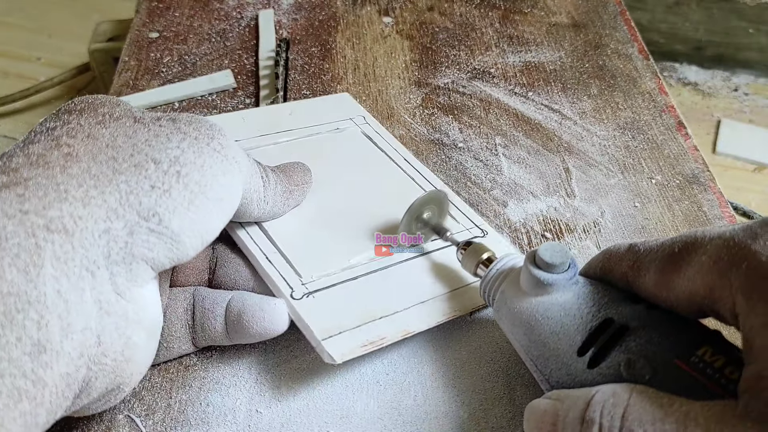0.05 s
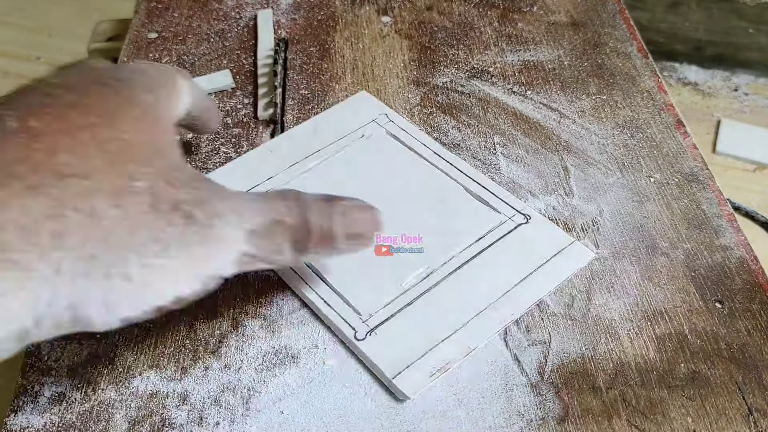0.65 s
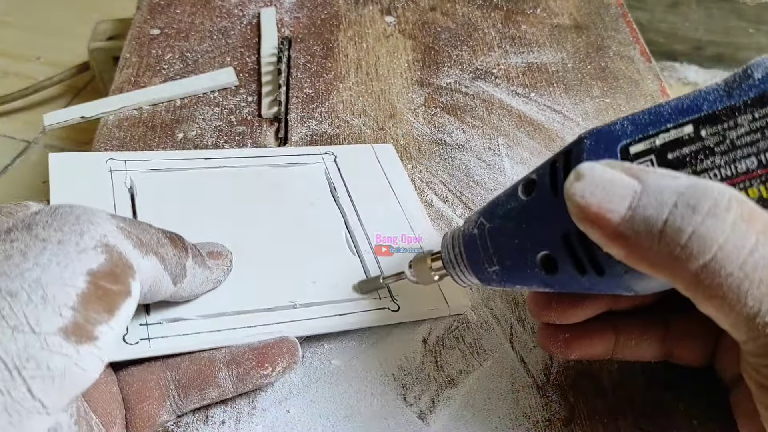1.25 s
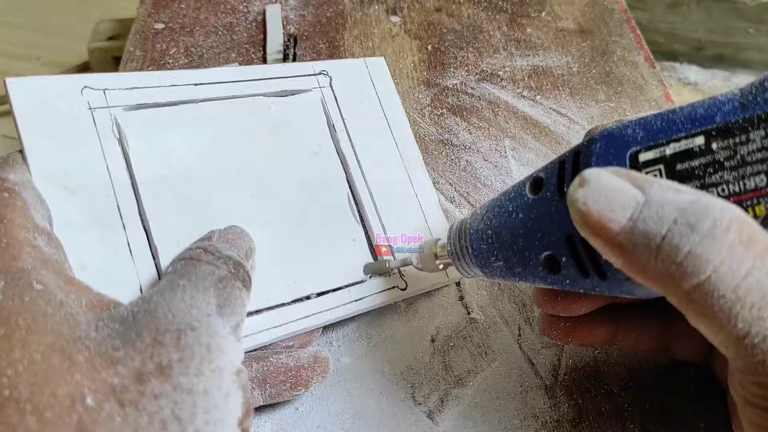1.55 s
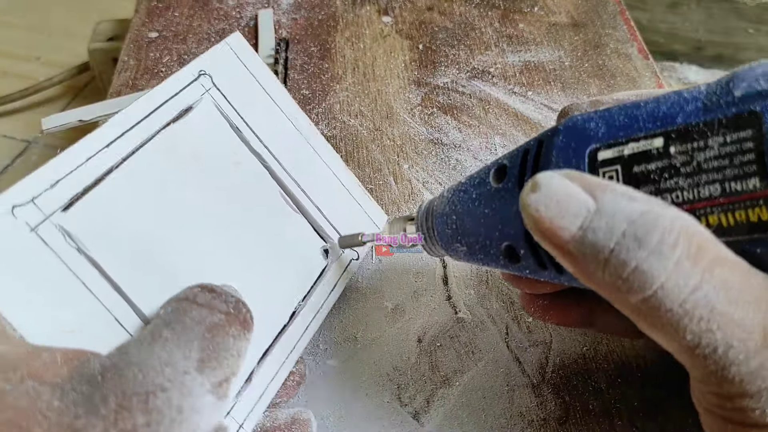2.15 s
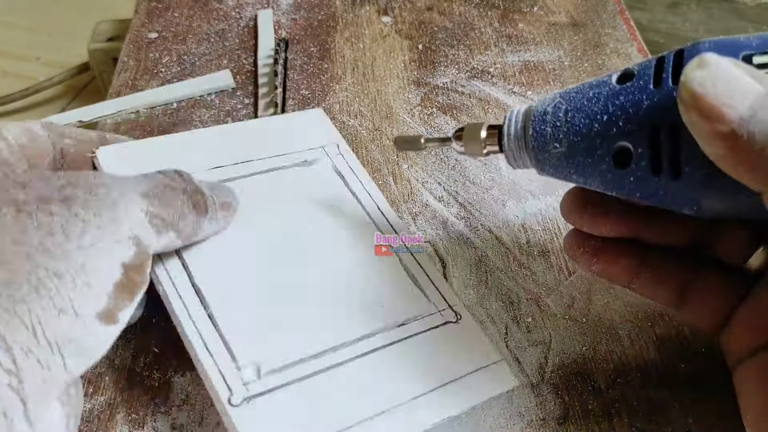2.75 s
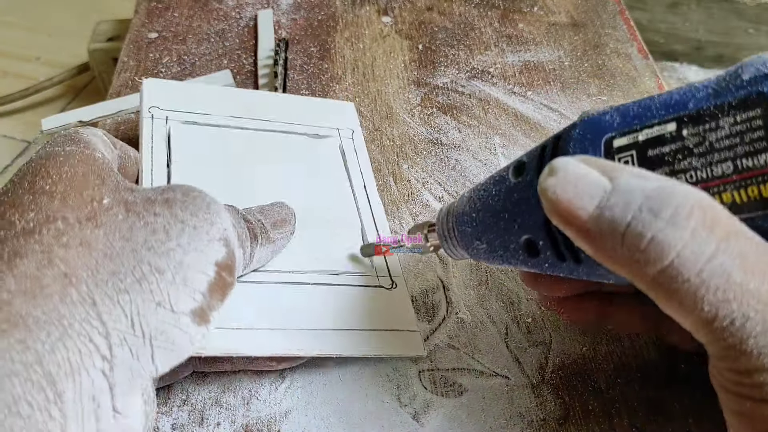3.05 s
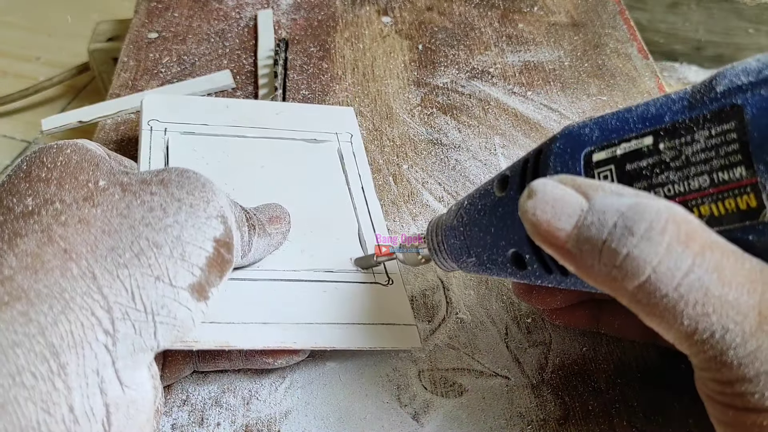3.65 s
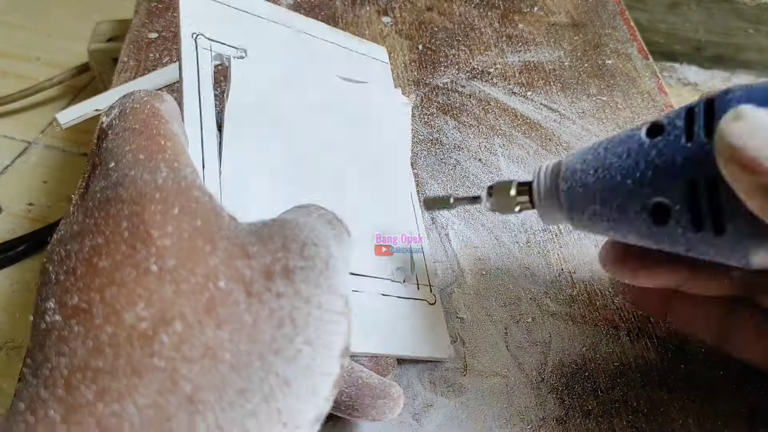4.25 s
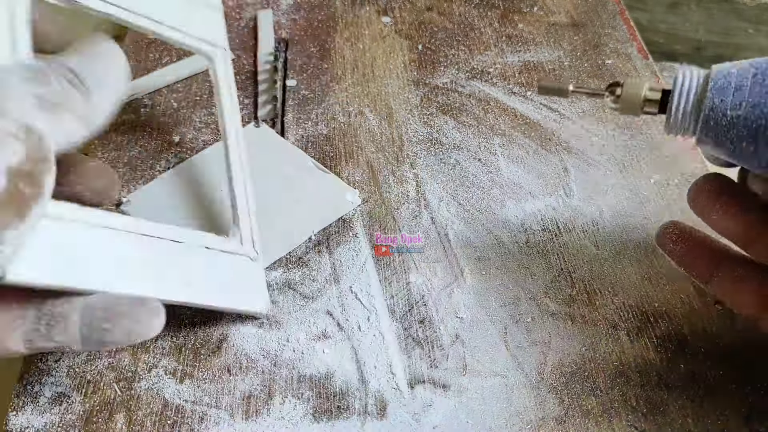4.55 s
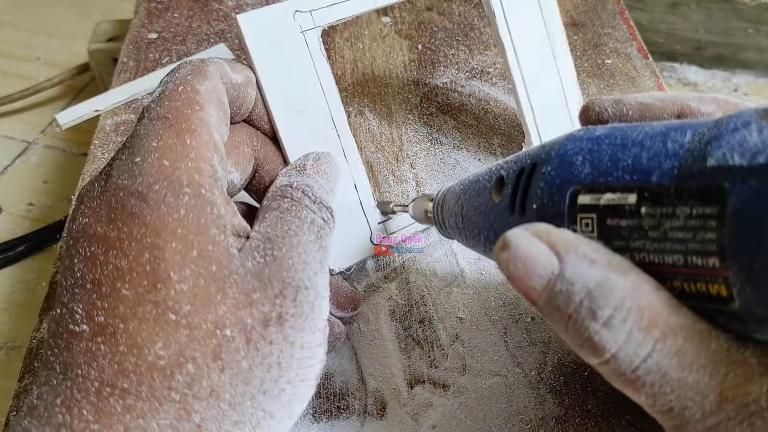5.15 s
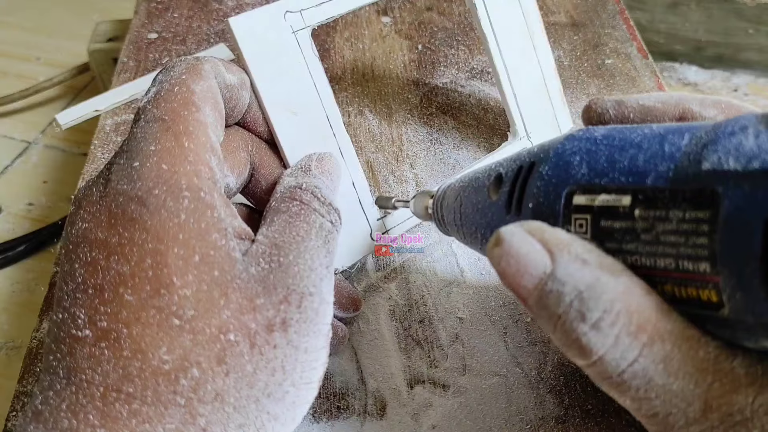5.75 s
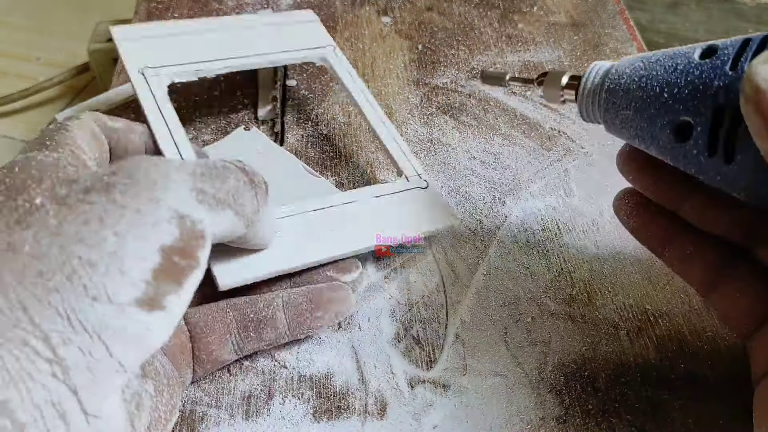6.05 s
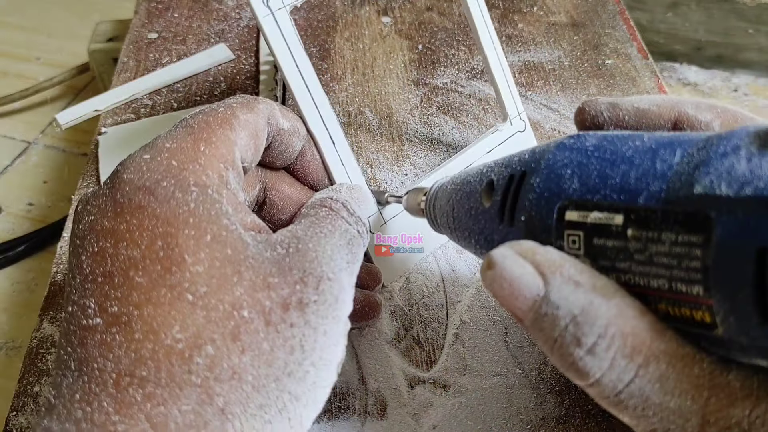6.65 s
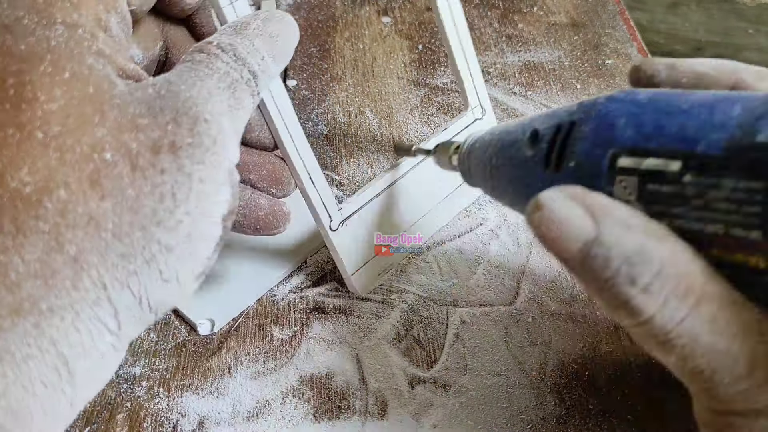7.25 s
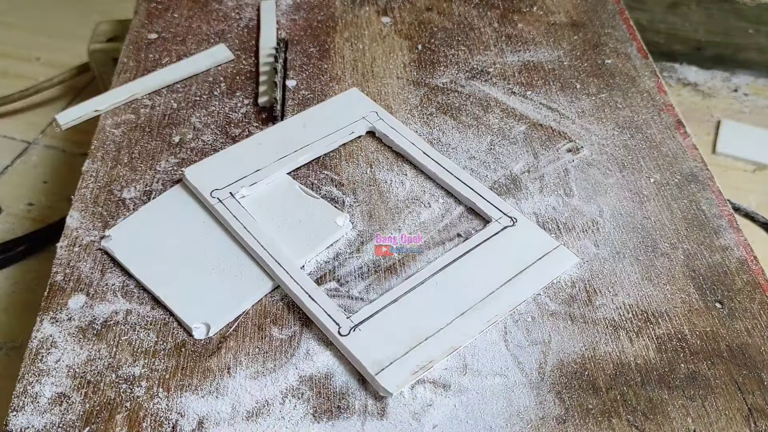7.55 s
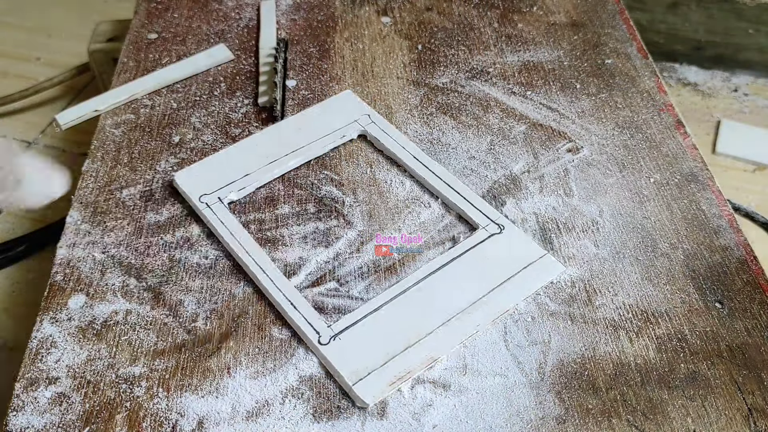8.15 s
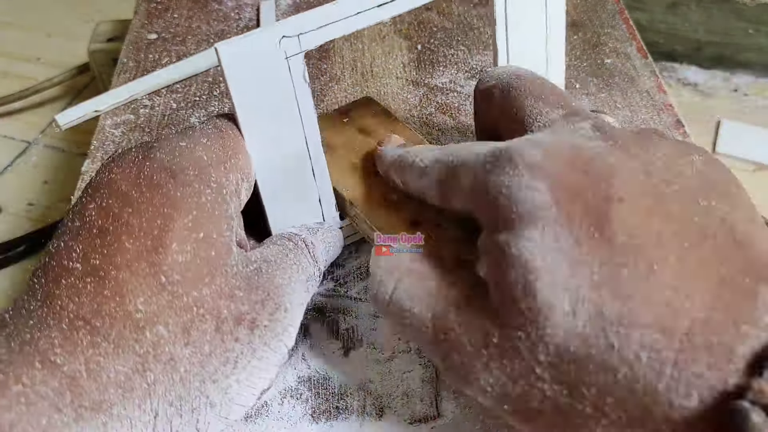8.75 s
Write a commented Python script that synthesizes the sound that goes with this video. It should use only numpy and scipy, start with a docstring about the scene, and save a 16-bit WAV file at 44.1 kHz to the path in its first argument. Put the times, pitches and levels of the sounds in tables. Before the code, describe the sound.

A handheld rotary grinder rasps into a plastic sheet, then spins up to a high, hissing whine. It bites in again and again, its pitch sagging each time as the plastic buzzes, chatters, squeals and ticks. Near the end the motor is switched off and runs down, the piece is picked up with soft bumps, and a sanding block scrapes briefly. Close stereo sound in a small, dry workshop.

```python
"""Close to a workbench in a small, dry workshop, a stereo microphone hears a hand-held rotary grinder.
Its motor whines and hisses as a thin disc makes the first cut in a plastic sheet. A burr makes the rest:
each bite drags the speed down, and the sheet buzzes once a turn, chatters, squeals and ticks.
Near eight seconds the motor is switched off and runs down. The cut frame is picked up,
and a sanding block judders along its edge."""
import sys
import numpy as np
from scipy import signal
from scipy.fft import rfft, irfft, next_fast_len
from scipy.io import wavfile
from scipy.ndimage import map_coordinates

SR = 44100
rng = np.random.default_rng(int(sys.argv[2]) if len(sys.argv) > 2 else 0)


def to_wav(sig):
    """Store sig (one row per channel, or 1-D mono) as 16-bit WAV at the path in sys.argv[1].

    Samples outside -1..1 are clipped; the rate is SR.
    """
    pcm = np.clip(np.atleast_2d(sig), -1, 1) * 32767
    pcm = np.round(pcm).astype(np.int16)
    wavfile.write(sys.argv[1], SR, pcm.T)  # frames by channels


N = 397341
TIME = np.arange(N) / SR
DISC_END_S, POWER_OFF_S, STOP_S = .45, 7.715, 8.05


def amp(db):
    """Decibels to gain."""
    return 10 ** (np.asarray(db) / 20)


def unit(x):
    """Scale to rms 1."""
    return x / np.sqrt(np.mean(x ** 2) + 1e-20)


def along(points, hz):
    """Read (Hz, value) points on a log axis."""
    freqs, values = np.transpose(points)
    return np.interp(np.log(hz + 1), np.log(freqs + 1), values)


def curve(points):
    """Read (seconds, value) points at every sample."""
    return np.interp(TIME, *np.transpose(points))


def gate(start, end, fade):
    """1 between two times, with ramps outside them."""
    return np.clip(np.minimum(TIME - start, end - TIME) / fade + 1, 0, 1)


def since(start):
    """Seconds after a time, 0 before it."""
    return np.maximum(TIME - start, 0)


def swell(centre, length):
    """A smooth rise and fall around a time."""
    return np.exp(-np.minimum((2 * (TIME - centre) / length) ** 2, 20))


def blows(rows, rise, t60):
    """An envelope that jumps and dies away at each (seconds, dB) row."""
    return sum(amp(db - 60 * since(s) / t60) * (1 - np.exp(-since(s) / rise)) for s, db in rows)


def wobble(rate):
    """A smooth random curve, rate knots a second."""
    knots = rng.standard_normal(int(N * rate / SR) + 4)
    coarse = TIME[::max(1, int(SR / rate / 10))]
    return np.interp(TIME, coarse, map_coordinates(knots, [coarse * rate]))


def noise():
    """White noise, unrelated left and right."""
    return rng.standard_normal((2, N))


def partial(phase, spread):
    """A sine whose phase drifts apart left and right."""
    apart = spread * wobble(3) * np.array([[1], [-1]])
    return np.sin((phase % (2 * np.pi) + apart).astype(np.float32))


def filtered(x, response):
    """x times a response of frequency."""
    size = next_fast_len(N + 8192)
    return irfft(rfft(x, size) * response(np.fft.rfftfreq(size, 1 / SR)), size)[..., :N]


def coloured(x, spectrum):
    """x through a (Hz, dB) spectrum, at rms 1."""
    return unit(filtered(x, lambda hz: amp(along(spectrum, hz))))


def pan(left_db):
    """Channel gains for a left minus right level."""
    return amp(np.array([[.5], [-.5]]) * left_db)


def scatter(x, share, t60):
    """Bench and hands reflect a close source differently to each side of the microphone."""
    t = np.arange(1024) / SR
    echoes = rng.standard_normal((2, len(t))) * amp(-60 * t / t60)
    paths = np.sqrt(share) * echoes / np.linalg.norm(echoes, axis=1, keepdims=True)
    paths[:, 0] = np.sqrt(1 - share)
    return signal.fftconvolve(x[None], paths, axes=1)[:, :N]


# The tool bites the sheet. Each row: start, end and lean-in time in seconds, drag in turns a second,
# relative cutting level in dB at the start and at the end, relative hum in dB, share of rasp from 0 to 1.
BITES = [ (0, 0.101, .0087, 258, -25, -27.5, -38, 0.67), (0.102, 0.216, .005, 188, -28, -31.5, -49, 0.85),
         (0.231, 0.293, .01, 0, -31.5, -33, -40, 0.99), (0.314, 0.416, .013, 0, -28, -31, -31.5, 0.6),
         (1.211, 1.488, .085, 127.5, -23.5, -21, -36.5, 0.15),
         (1.605, 1.655, .0082, 75, -26, -35, -42, 0.4), (1.873, 2.014, .023, 88.5, -32, -26.5, -39.5, 0.4),
         (2.291, 2.508, .044, 102.5, -31, -24.5, -40, 0.38),
         (3.245, 3.75, .085, 162, -24.5, -22, -33, 0.27), (3.803, 3.936, .012, 133, -33, -29, -43.5, 0.1),
         (3.948, 4.048, .01, 0, -30.5, -32.5, -45, 0.26), (4.064, 4.294, .01, 103, -30.5, -27.5, -29, 0.37),
         (5.187, 5.421, .069, 84, -27, -24, -36.5, 0.29), (5.55, 5.746, .035, 87, -29, -26, -36, 0.5),
         (6.542, 6.89, .17, 117.5, -31.5, -22.5, -62, 0.5),
         (7.09, 7.309, .069, 22.5, -30.5, -27.5, -60, 0.26)]
def feed():
    """Each bite drags on the shaft, drives the sheet and shakes the tool; the hand is never steady."""
    drag, force, shake, rasp = np.zeros((4, N))
    for start, end, lean, drag_hz, first_db, last_db, hum_db, share in BITES:
        held = gate(0, end, fade=.005)
        touch = held * gate(start, TIME[-1], fade=.022) ** 2  # grazes just before it bites
        drag += drag_hz * held * (1 - np.exp(-since(start) / lean))
        force = np.maximum(force, touch * amp(np.interp(TIME, [start, end], [first_db, last_db])))
        shake = np.maximum(shake, touch * amp(hum_db))
        rasp[touch > 0] = share
    return drag, force * amp(.8 * wobble(30)), shake, rasp


# The unloaded shaft. Each row: time in seconds, speed in turns a second.
FREE_SPEED = [(1, 412.5), (3, 405.4), (5, 403.2), (6.4, 398.1), (7.6, 403.6)]
# The pitch jumps, then settles. Each row: time in seconds, turns a second gained.
SPEED_JUMPS = [(0, -126), (.43, 25.5), (3.77, 60), (4.055, 10), (7.075, 22)]
def shaft_speed(drag):
    """Turns a second: the shaft sags under drag, recovers with inertia and coasts once switched off."""
    inertia_s, coast_hz_per_s = .247, 410
    keep = np.exp(-1 / (inertia_s * SR))
    sag = signal.lfilter([1 - keep], [1, -keep], drag)
    jumps = sum(gain * gate(s, TIME[-1], fade=.01) * np.exp(-since(s) / inertia_s)
                for s, gain in SPEED_JUMPS)
    coast = coast_hz_per_s * np.minimum(since(POWER_OFF_S), STOP_S - POWER_OFF_S)
    drift = 1 + .0009 * wobble(35)
    return (curve(FREE_SPEED) - sag + jumps - coast) * drift


# Harmonics of the shaft. Each row: order, relative level in dB.
ORDER_LEVELS = [(2, -0.5), (3, -2), (4, 4), (5, -5.5), (6, -1), (7, -2), (8, 1), (9, 2.5), (10, 1.5),
                (11, 0), (12, 0.5), (13, 8), (14, 6), (15, 0.5), (16, 0.5), (17, 1.5), (18, 1), (19, -1),
                (20, 4.5), (21, 6.5), (22, 4.5), (23, 6), (24, 6), (25, 4.5), (26, 9.5), (27, 4), (30, 8.5),
                (38, 6.5)]
# Single orders whistle out as the tool turns in the hand.
# Each row: centre in seconds, order, boost in dB, length in seconds.
WHISTLES = [(3.04, 22, 1, 0.55), (4.17, 21, 5.5, 0.39), (0.92, 17, 6.5, 0.69), (1.1, 19, 3.5, 0.34),
            (1.108, 14, 8, 0.12), (1.62, 21, 6.5, 0.16), (2.19, 22, 9.5, 0.36), (3.12, 18, 7, 0.19),
            (3.15, 9, 7, 0.13), (5.118, 14, 4.5, 0.19), (5.122, 16, -1, .3), (5.73, 21, 12, 0.22),
            (6.15, 11, 10.5, 0.23), (6.152, 12, 13, 0.22), (4.3, 14, 10, .25), (6.451, 17, 8, 0.3),
            (7.39, 17, 8, 0.59), (7.2, 19, 9.5, 0.3)]
def whine(phase):
    """Commutator and fan sing on the shaft orders, each fluttering on its own."""
    tones = np.zeros((2, N))
    for order in range(2, 39):
        boost_db = sum(db * swell(s, length) for s, k, db, length in WHISTLES if k == order)
        level_db = np.interp(order, *np.transpose(ORDER_LEVELS)) + boost_db
        offset = rng.uniform(0, 2 * np.pi) + .33 * wobble(110)
        flutter_db = 2.2 * wobble(38) + 2.2 * wobble(6)
        tones += amp(level_db + flutter_db) * partial(order * phase + offset, spread=.9)
    return tones


# Colour of the casing and vents. Each row: frequency in Hz, relative level in dB.
CASING_COLOUR = [(70, -39), (150, -62.5), (300, -12), (480, -21.5), (750, -14.5), (1250, -3.5),
                 (1600, -6.5), (1900, -6.5), (3600, -11.5), (5200, -6), (7500, 3), (8800, -0.5),
                 (10000, -15.5), (11200, -25.5), (15000, -32)]
# The vents beam unevenly at the microphone. Each row: frequency in Hz, left minus right in dB.
VENT_BEAM = [(200, 9.5), (770, 6.5), (1800, 4.5), (2700, 1), (4200, -1.5), (6400, -2.5), (7700, -6),
             (8800, 8.5), (10000, 4.5), (13000, -1)]
# Whine and hiss from close by. Each row: time in seconds, level at full speed in dB.
MOTOR_LEVEL = [(0, -14), (.22, -18.5), (.38, -16.5), (.45, -24), (.58, -22.5), (.86, -20), (1.4, -20.5),
               (2.2, -20.5), (2.9, -21.5), (3.14, -19), (3.33, -20.5), (3.7, -15.5), (3.9, -19),
               (4.5, -20.5), (5.1, -19.5), (5.5, -21), (6.5, -20), (6.8, -20), (7.38, -19.5), (7.6, -22),
               (7.87, -34), (8.04, -34.5)]
# The grinder moves across the bench. Each row: time in seconds, left minus right in dB.
MOTOR_PAN = [(0, -0.5), (1.7, 1.5), (2.25, 0.8), (2.75, -1), (3.3, 2), (4.2, 1), (4.75, -1), (5.75, 0),
             (6.25, 0.5), (6.75, -1.5), (7.25, 0), (7.75, -5.5)]
def motor(speed, turns, force):
    """The motor whines clearly when free; under load it dissolves into brush hiss, pulsing once a turn."""
    steady_order, steady_db = 13, -17  # the most constant tone, against the whole casing
    slowing_db_per_hz = .0672
    phase = 2 * np.pi * turns
    free = speed / speed.max()
    rattle = (.008 + .05 * (1 - free)) * wobble(130)  # load shakes the shaft and blurs high orders
    tones = whine(phase + rattle)
    sparks = (1 + .5 * np.cos(phase)) * amp(wobble(700))
    hiss = coloured(noise() * sparks, CASING_COLOUR)
    clear = .77 * free ** 2.2 * gate(0, POWER_OFF_S, fade=.12) / (1 + (force / amp(-27)) ** 2)
    casing = unit(np.sqrt(clear) * coloured(tones, CASING_COLOUR) + np.sqrt(1 - clear) * hiss)
    casing = unit(filtered(casing, lambda hz: pan(along(VENT_BEAM, hz))))
    steady_gain = amp(steady_db + 2.5 * wobble(30) + 1.8 * wobble(7)) * clear * free ** 6
    casing += steady_gain * unit(partial(steady_order * (phase + rattle), spread=.5))
    level_db = curve(MOTOR_LEVEL) - slowing_db_per_hz * (speed.max() - speed)
    casing *= amp(level_db + 1.53 * wobble(45)) * pan(curve(MOTOR_PAN))
    return casing * gate(0, STOP_S, fade=.0027)


# Tones of the supply. Each row: frequency in Hz, relative level in dB.
MAINS_TONES = [(200, -6), (300, -5), (600, -1)]
# Their faint buzz, left of the microphone. Each row: time in seconds, level in dB.
MAINS_LEVEL = [(0, -62), (1, -64.5), (2, -61.5), (2.7, -53), (3.3, -60.5), (4.6, -57.5), (5.2, -62.5),
               (7.7, -62)]
def mains_buzz():
    """The supply makes the motor laminations buzz until the switch is released."""
    tones = sum(amp(db + 3.1 * wobble(12)) * unit(np.sin(2 * np.pi * hz * TIME)) for hz, db in MAINS_TONES)
    return amp(curve(MAINS_LEVEL)) * tones * gate(0, POWER_OFF_S, fade=.018) * pan(6.28)


# Hum of the free shaft, a little to the left. Each row: time in seconds, relative level in dB.
HUM_LEVEL = [(.47, -60), (.64, -39), (1.1, -46), (1.7, -38), (2.35, -43), (2.54, -52), (2.64, -38),
             (3.2, -45), (3.9, -60), (4.65, -38.5), (4.95, -43), (5.07, -53), (5.2, -40), (5.8, -36),
             (6.12, -49), (6.26, -40), (7.42, -43.5), (7.75, -62), (8.05, -84)]
def shaft_hum(turns, shake):
    """The unbalanced shaft hums once a turn, louder when a bite shakes the tool."""
    flutter = amp(1.2 * wobble(35) + 1.1 * wobble(9))
    level = np.hypot(amp(curve(HUM_LEVEL)), shake) * amp(1)
    return level * flutter * unit(partial(2 * np.pi * turns, spread=.35)) * pan(3.1)


# The tool bounces. Each row: start and end in seconds, turns per bounce, depth from 0 to 1.
CHATTER = [(.05, .36, 2, .35), (1.59, 1.66, 3, .5), (3.18, 3.28, 2, .6), (3.58, 3.74, 3, .4),
           (3.82, 4.05, 3, .6), (6.58, 6.8, 3, .35), (7.07, 7.32, 4, .5)]
# Colours of the grinding disc, the sheet under the burr and the tearing dust, all close up.
# Each row: frequency in Hz, relative level in dB.
DISC_COLOUR = [(200, -27), (480, 0.5), (680, -10.5), (950, 6), (1200, -1), (1650, 0), (2000, -6), (2230, 2),
               (2500, -3), (3200, -3.5), (6500, -0.5), (8200, -8), (10000, -8.5), (15000, -25)]
SHEET_COLOUR = [(200, -44), (350, -40), (560, -0.5), (740, -2), (950, -2), (1170, 3), (1400, 3),
                (1550, 1.5), (1850, -1), (2300, -3), (2900, -5.5), (3500, -9), (4500, -12), (6000, -24)]
DUST_COLOUR = [(200, -34), (550, -20), (850, -12), (1400, 11.5), (2000, -2.5), (3000, -0.5), (3800, -6.5),
               (5200, 0), (9000, -3.5), (15000, -29)]
def cutting(turns, drag, force, rasp):
    """First the disc grinds; later the burr strikes the sheet once a turn, tearing off puffs of dust."""
    firm_drag_hz = 36  # the bite turns bright here
    bounce = np.ones(N)
    for start, end, period, depth in CHATTER:
        swing = np.cos(2 * np.pi * turns / period + .9 * wobble(40))
        bounce += depth * gate(start, end, fade=.0033) * swing
    contact = turns + .003 * wobble(140) + .025 * (bounce - 1)  # a bounce shifts the next strike
    strength = bounce * amp(.6 * wobble(350) + 1.2 * wobble(40))
    light_touch = (TIME > DISC_END_S) / (1 + (drag / firm_drag_hz) ** 2)
    strikes = np.zeros((2, N))
    for order in range(2, 17):  # the orders lock into hard strikes
        dull_db = max(order - 4, 0) * light_touch
        emphasis_db = 2.4 * wobble(16) + 1.1 * wobble(90)  # shifts as the burr travels along the cut
        phase = 2 * np.pi * order * contact + .03 * order * wobble(90)
        strikes += amp(emphasis_db - dull_db) * partial(phase, spread=.95)
    strikes *= strength
    puffs = noise() * strength * np.exp(-((contact % 1 - .5) / .53) ** 2)
    tone, grit = np.sqrt(1 - rasp), np.sqrt(rasp)
    burr = amp(-1.3) * tone * coloured(strikes, SHEET_COLOUR) + amp(1) * grit * coloured(puffs, DUST_COLOUR)
    disc = tone * coloured(strikes, DISC_COLOUR) + grit * coloured(noise() * strength, DISC_COLOUR)
    cut = force * np.where(TIME < DISC_END_S, amp(1) * disc, burr)
    return (cut + np.sqrt(np.abs(strength)) * squeals(contact)) * pan(.72)


# The workshop around the bench. Each row: frequency in Hz, seconds to decay by 60 dB.
ROOM_DECAY = [(200, 0.26), (2000, 0.16), (10000, 0.17)]
def room(x):
    """Each frequency of the workshop's short reverberation dies at its own speed."""
    hz, t, spectra = signal.stft(rng.standard_normal((2, SR // 3)), SR, nperseg=256)
    decay = amp(-60 * t / along(ROOM_DECAY, hz)[:, None])
    tail = signal.istft(spectra * decay, SR, nperseg=256)[1]
    return signal.fftconvolve(x, tail / np.linalg.norm(tail[0]), axes=1)[:, :N]


# Room tone all around the microphone. Each row: frequency in Hz, relative level in dB.
AIR_COLOUR = [(25, -19), (90, -20.5), (160, 4.5), (260, -7), (600, -18), (2000, -28), (8000, -17),
              (15000, -36)]
def air():
    """The quiet air of the workshop, a steady low rush."""
    return amp(-57.5) * coloured(noise(), AIR_COLOUR)


# The sheet squeals in the cut. Each row: start and end in seconds, shaft order, relative level in dB.
SQUEALS = [(0.08, 0.123, 4, -44), (0.134, 0.188, 9, -37), (.335, 0.403, 7, -36), (0.352, 0.39, 3, -32),
           (1.198, 1.26, 3, -32), (1.276, 1.398, 4, -29), (1.35, 1.425, 5, -30), (1.41, 1.488, 3, -32),
           (1.614, 1.621, 4, -26), (1.642, 1.655, 4, -29), (2.42, 2.506, 4, -29.5), (3.19, 3.301, 3, -31.5),
           (3.258, 3.283, 3.5, -25.5), (3.323, 3.394, 4, -30.5), (3.375, 3.465, 3, -31),
           (3.41, 3.436, 4, -27), (3.48, 3.52, 4, -30), (3.52, 3.59, 6, -25), (3.615, 3.727, 5, -31),
           (3.771, 3.773, 4, -22), (3.789, 3.812, 4, -23.5), (3.885, 3.895, 4, -34),
           (3.906, 3.916, 4, -29.5), (3.94, 3.953, 4, -30), (3.976, 3.998, 4, -33), (4.017, 4.051, 4, -32),
           (4.069, 4.12, 3, -31), (4.122, 4.139, 4, -34), (4.165, 4.179, 4, -31), (4.205, 4.231, 4, -27.5),
           (4.26, 4.295, 4, -28.5), (6.601, 6.64, 3, -36), (6.82, 6.859, 4, -26.5), (7.087, 7.107, 3, -32),
           (7.165, 7.215, 3, -34), (7.172, 7.225, 4, -34), (7.243, 7.29, 4, -27), (7.252, 7.303, 2, -30.5),
           (7.256, 7.308, 3, -27)]
def squeals(contact):
    """Single orders ring out on the sheet's resonances; a bouncing burr can also drive a half order."""
    levels = {}
    for start, end, order, db in SQUEALS:
        levels[order] = levels.get(order, 0) + amp(db) * gate(start, end, fade=.0046)
    return sum(level * unit(partial(2 * np.pi * order * contact, spread=.8))
               for order, level in levels.items())


# The sheet meets hand and bench. Each row: start in seconds, level in dB.
BUMPS = [(0.229, -41), (1.49, -45), (2.189, -40.5), (3.768, -46), (4.069, -44), (4.782, -43), (8.24, -44),
         (8.34, -48)]
def bumps():
    """Dull pushes of the sheet, too soft to ring."""
    thud_colour = [(25, -30), (70, -22), (170, 13), (280, 7), (700, -11), (3000, -89)]  # Hz, dB
    thud = coloured(scatter(noise()[0], share=.18, t60=.021), thud_colour)
    return blows(BUMPS, rise=.0009, t60=.12) * thud


# The burr catches on an edge. Each row: start in seconds, level in dB.
SNAGS = [(1.49, -24), (1.612, -19), (3.258, -24), (3.771, -24), (4.059, -25), (7.095, -18.5), (7.288, -23),
         (7.296, -22), (7.307, -25)]
def snags():
    """Each snag cracks the sheet once: a sharp tick that the plastic quickly damps."""
    crack = coloured(scatter(noise()[0], share=.2, t60=.0051), SHEET_COLOUR)
    return blows(SNAGS, rise=.00066, t60=.03) * crack


# Scrapes of the frame at the bench, then slips of the sanding block.
# Each row: start in seconds, relative levels of grit and of ring in dB, length in seconds.
SCRAPES = [(8.13, -52.5, -80, 0.026), (8.136, -51.5, -76, 0.068), (8.22, -37, -66, 0.023),
           (8.232, -43, -57, 0.007), (8.271, -36.5, -56, 0.018), (8.283, -54, -54.5, 0.19),
           (8.477, -48, -45, 0.02), (8.503, -39.5, -31, 0.013), (8.507, -54, -37.5, 0.052),
           (8.545, -32.5, -42, 0.011), (8.578, -44, -28, 0.028), (8.609, -36.5, -42, 0.022),
           (8.699, -40, -35.5, 0.033), (8.745, -31, -33, 0.014), (8.771, -34.5, -36, 0.022),
           (8.804, -34, -34, 0.026), (8.839, -38, -36, 0.017), (8.868, -35.5, -40, 0.022),
           (8.904, -38, -40, 0.022), (8.933, -38, -40, 0.027), (8.97, -31.5, -46, 0.015),
           (8.996, -43, -40, .026)]
# Resonances of the cut frame. Each row: frequency and width in Hz, relative level in dB.
FRAME_MODES = [(168, 42, -16), (435, 50, 5.5), (906, 83, -6.5), (1240, 230, -16), (2010, 140, -17)]
# Colour of the abrasive. Each row: frequency in Hz, relative level in dB.
GRIT_COLOUR = [(60, -38), (300, 1), (600, -5.5), (900, -3), (1250, 3), (1700, -6), (3000, -8),
               (5000, -12.5), (7600, -3.5), (9000, -10), (11000, -31), (15000, -35)]
def sanding():
    """The block sticks and slips; each slip crunches grit and rings the frame."""
    grit = amp(-44.5) * gate(8.74, TIME[-1], fade=.024)  # steady rubbing through the long stroke
    ring = np.zeros(N)
    for start, grit_db, ring_db, length in SCRAPES:
        age = np.minimum(since(start) / (length / 2), 20)
        slip = (age * np.exp(1 - age)) ** 5.3  # swells, peaks and trails off
        grit += amp(grit_db) * slip
        ring += amp(ring_db) * slip
    frame = unit(sum(amp(db) * partial(2 * np.pi * hz * TIME + wobble(width), spread=.14)
                     for hz, width, db in FRAME_MODES))
    grains = coloured(noise() * amp(2.4 * wobble(1200)), GRIT_COLOUR)
    return grit * grains * pan(.27) + amp(-1) * ring * frame * pan(2.8)


def scene():
    """Grinder, sheet and sanding block on the bench; the cut and the hum sound drier than the whine."""
    drag, force, shake, rasp = feed()
    speed = shaft_speed(drag)
    turns = np.cumsum(speed) / SR
    bench = motor(speed, turns, force) + mains_buzz() + bumps() + sanding()
    close = cutting(turns, drag, force, rasp) + snags() + shaft_hum(turns, shake)
    return bench + close + room(amp(-3) * bench + amp(-6.5) * close) + air()


def record(dry):
    """The microphone keeps nothing above its band limit."""
    return filtered(dry, lambda hz: hz < 15350)


dry = scene()
out = record(dry)
to_wav(out)
```